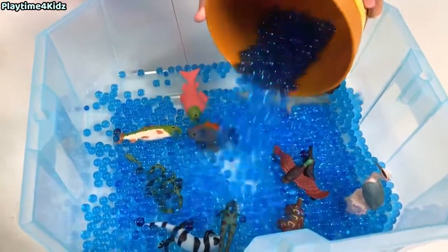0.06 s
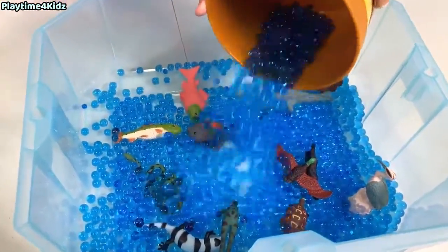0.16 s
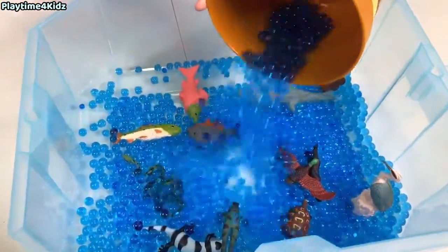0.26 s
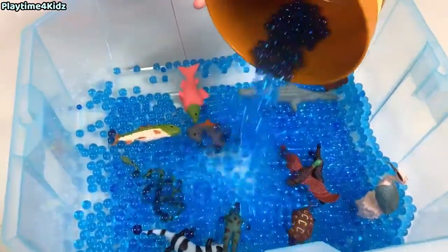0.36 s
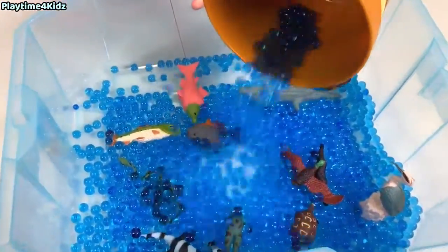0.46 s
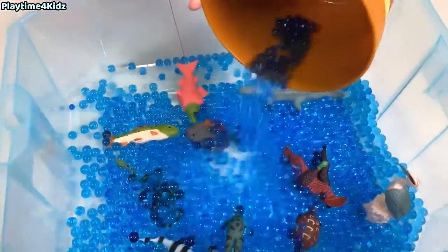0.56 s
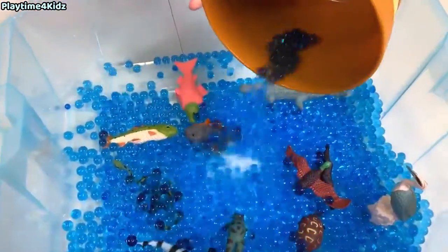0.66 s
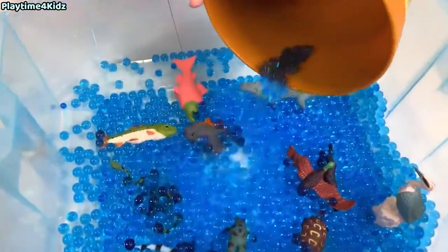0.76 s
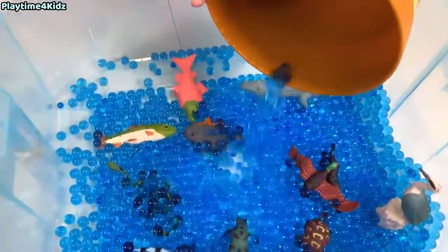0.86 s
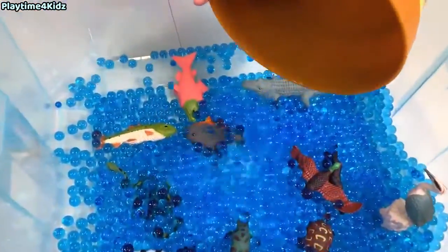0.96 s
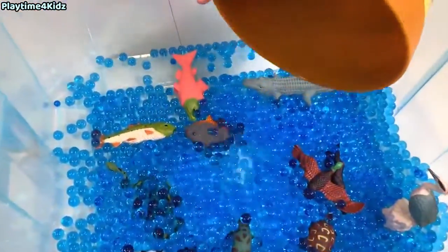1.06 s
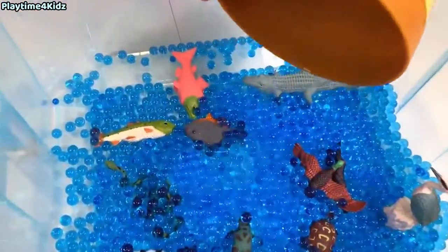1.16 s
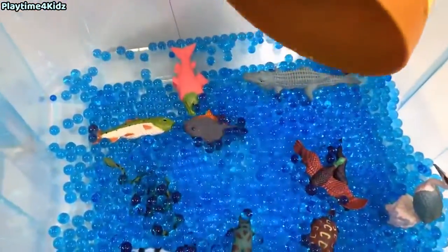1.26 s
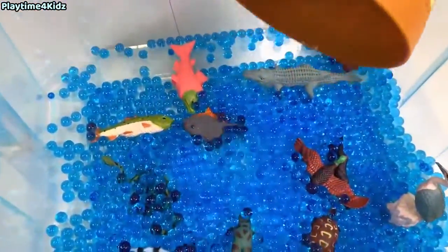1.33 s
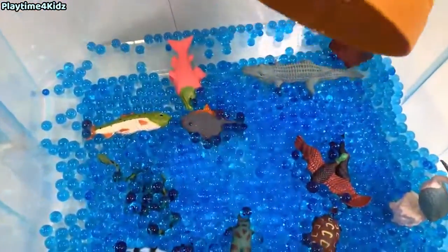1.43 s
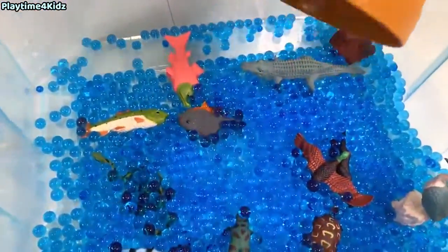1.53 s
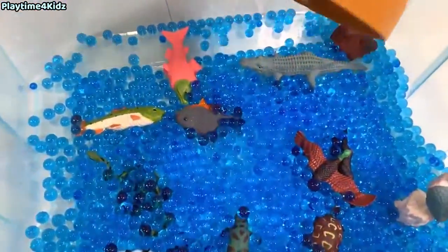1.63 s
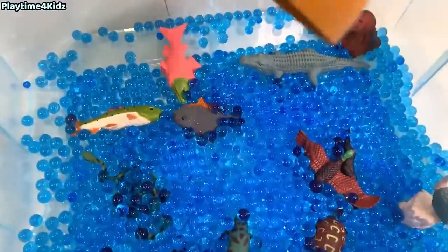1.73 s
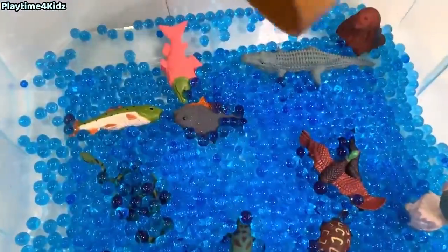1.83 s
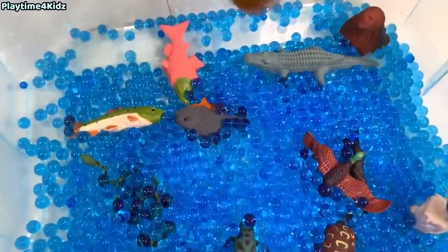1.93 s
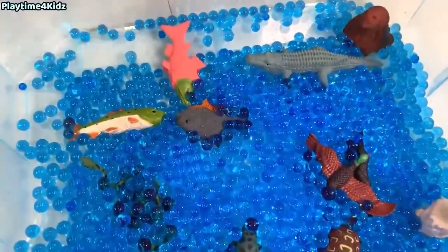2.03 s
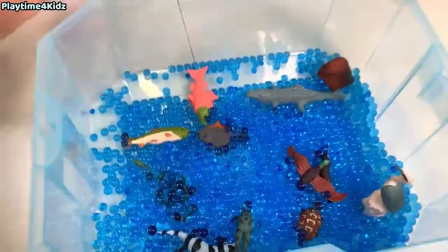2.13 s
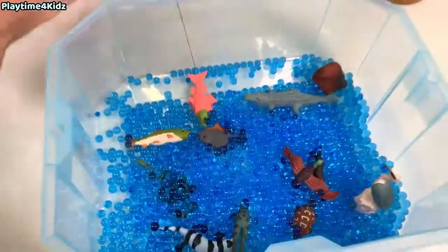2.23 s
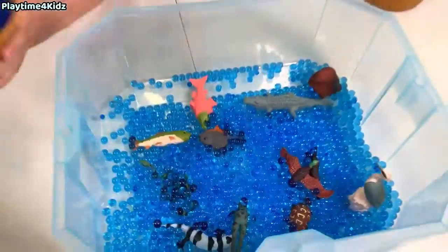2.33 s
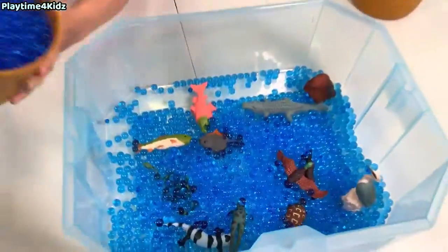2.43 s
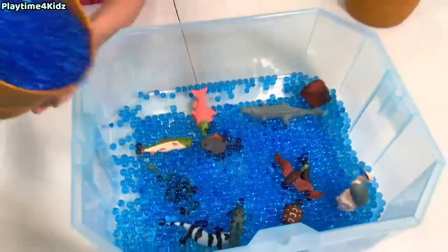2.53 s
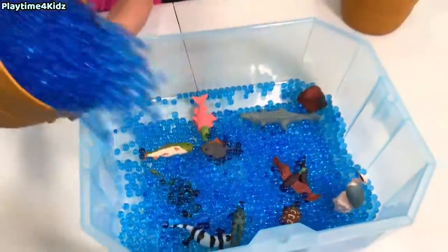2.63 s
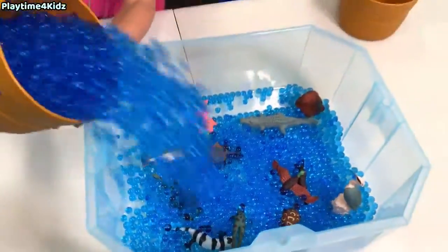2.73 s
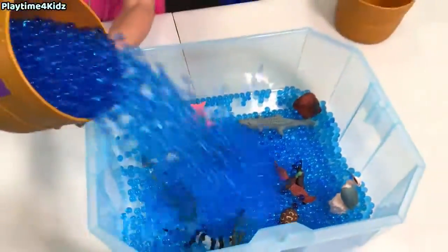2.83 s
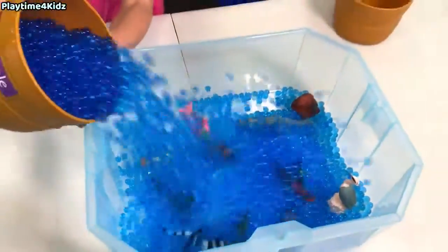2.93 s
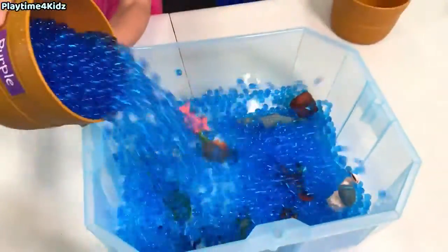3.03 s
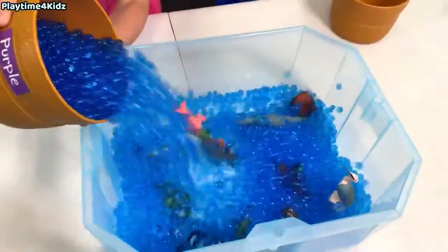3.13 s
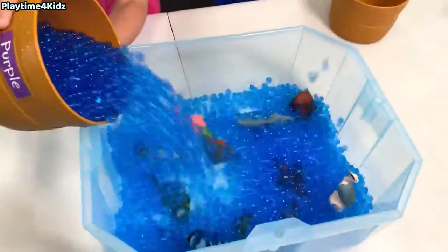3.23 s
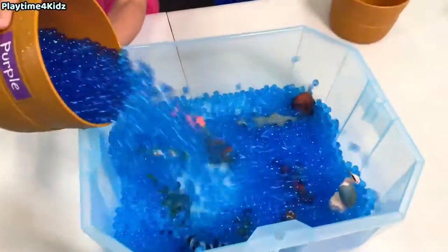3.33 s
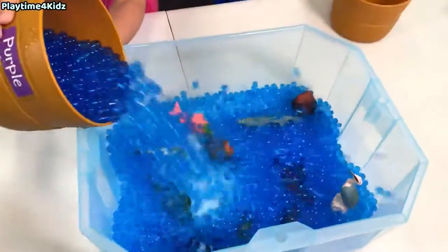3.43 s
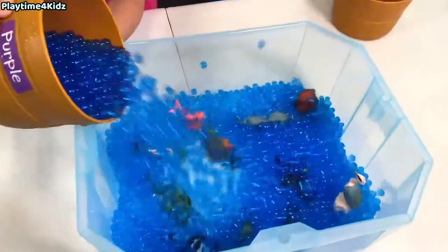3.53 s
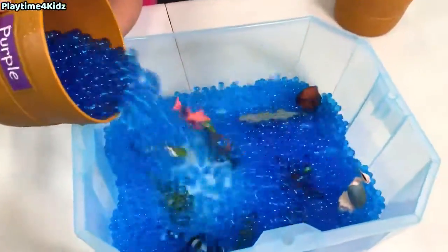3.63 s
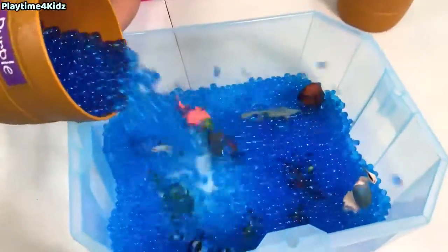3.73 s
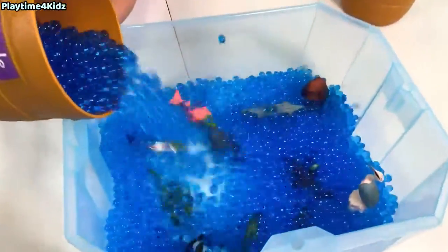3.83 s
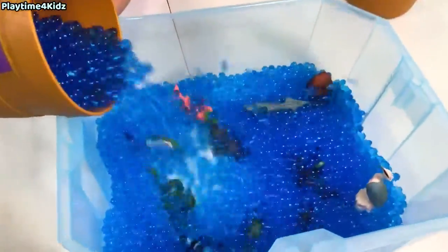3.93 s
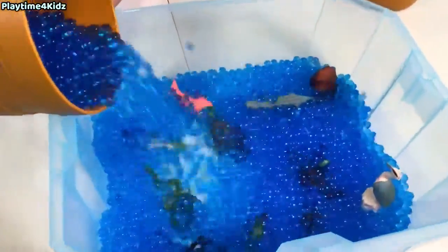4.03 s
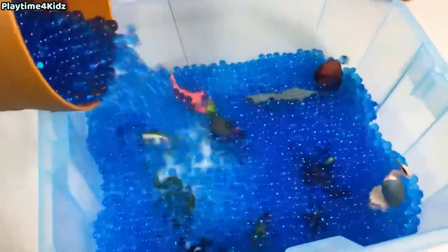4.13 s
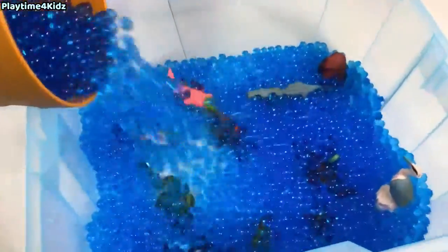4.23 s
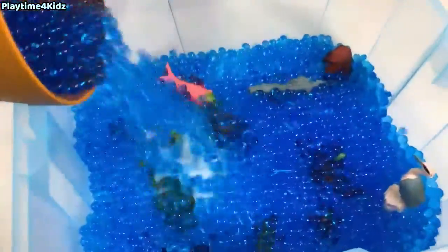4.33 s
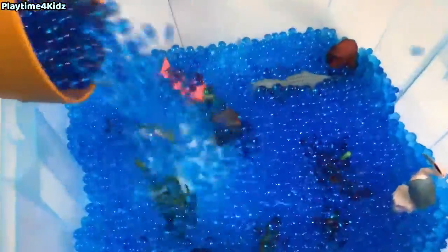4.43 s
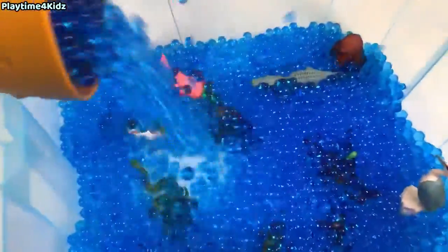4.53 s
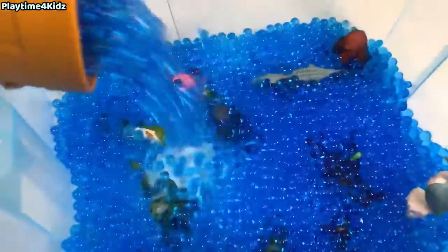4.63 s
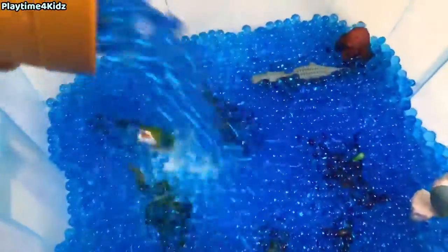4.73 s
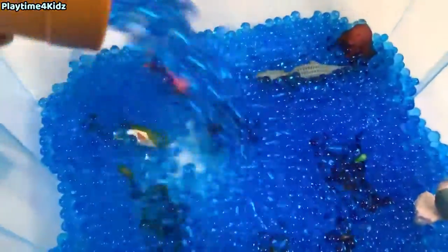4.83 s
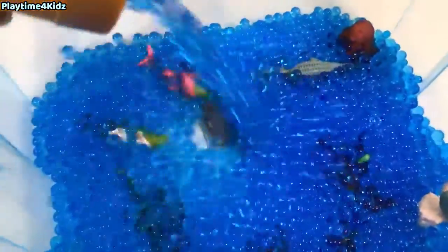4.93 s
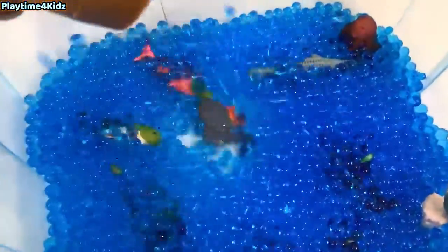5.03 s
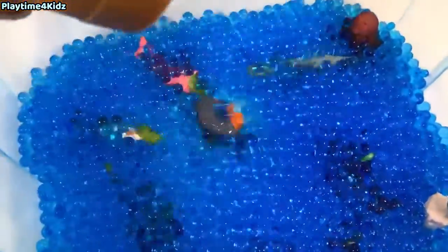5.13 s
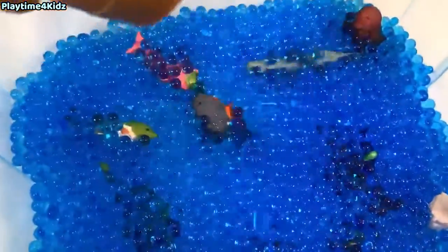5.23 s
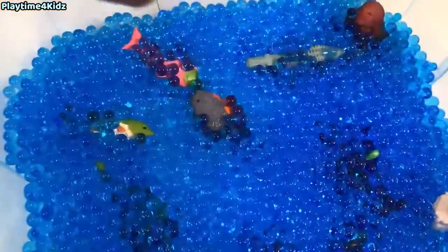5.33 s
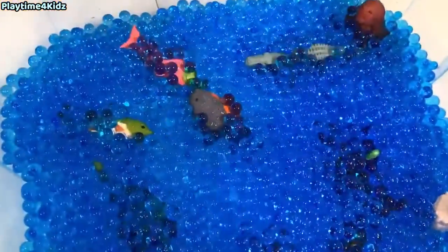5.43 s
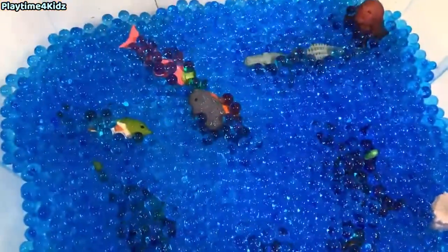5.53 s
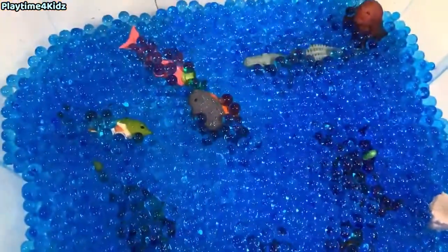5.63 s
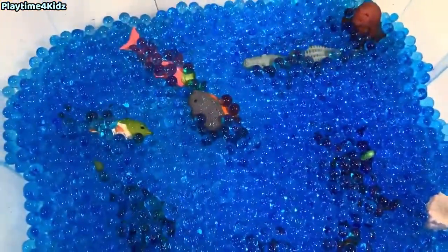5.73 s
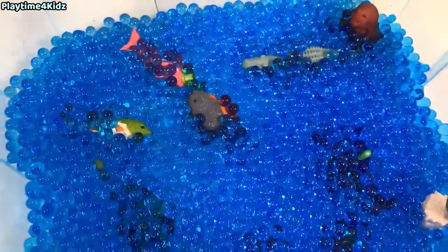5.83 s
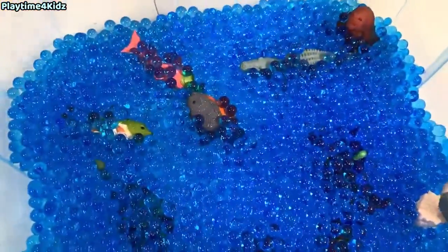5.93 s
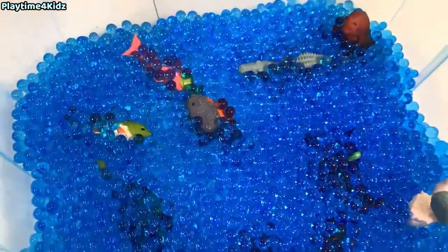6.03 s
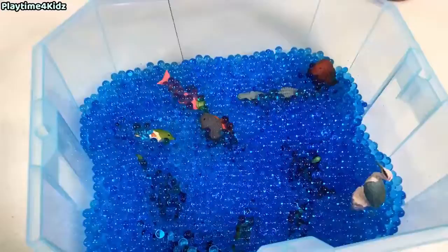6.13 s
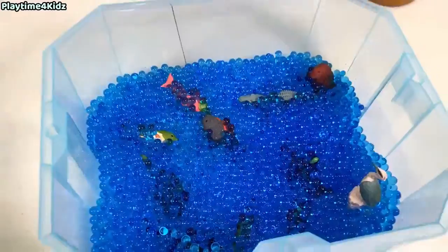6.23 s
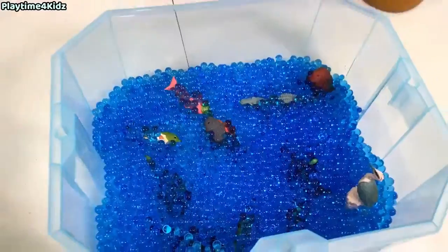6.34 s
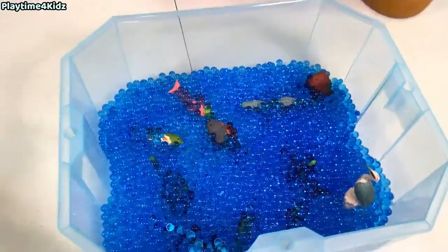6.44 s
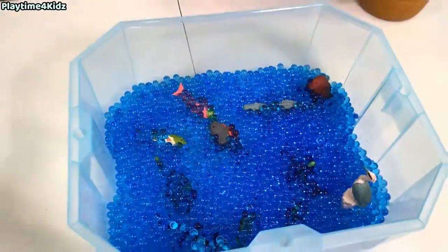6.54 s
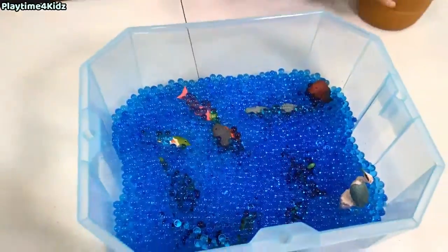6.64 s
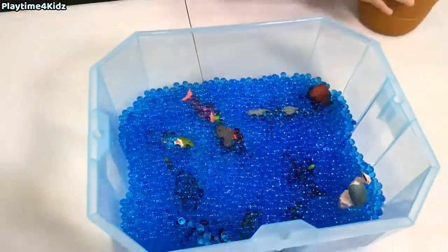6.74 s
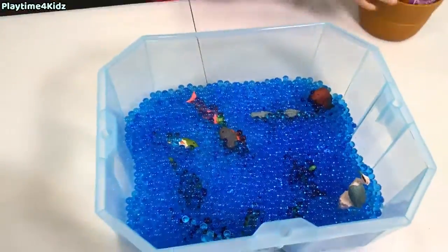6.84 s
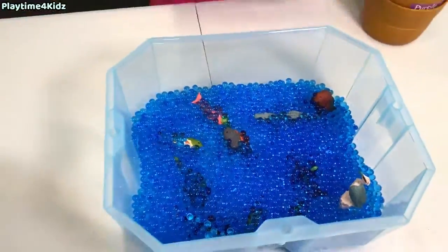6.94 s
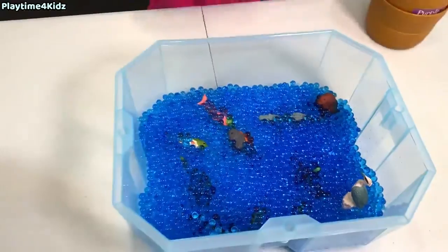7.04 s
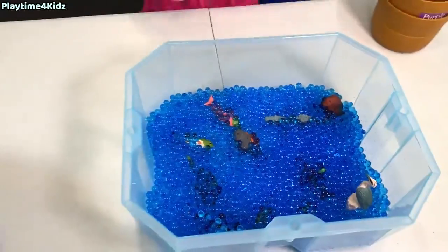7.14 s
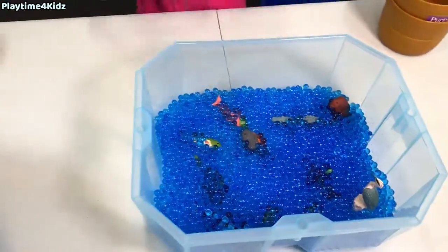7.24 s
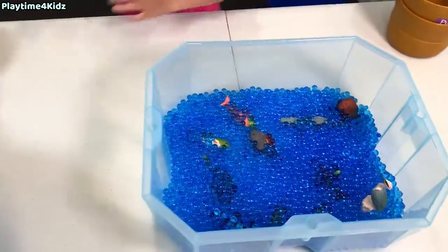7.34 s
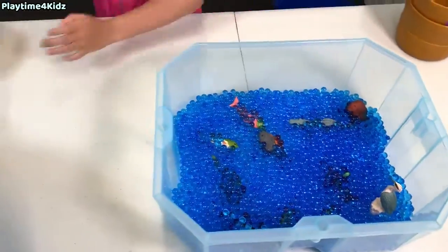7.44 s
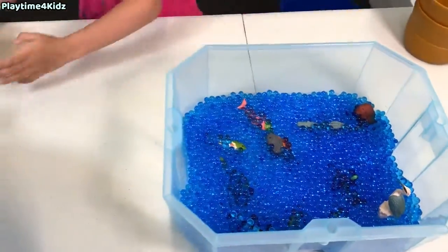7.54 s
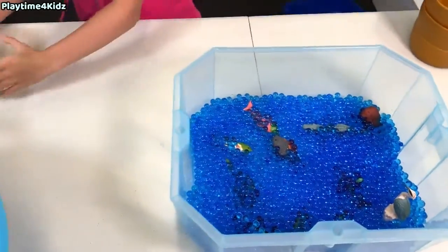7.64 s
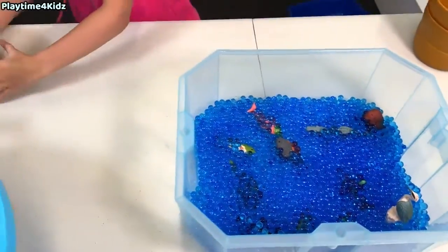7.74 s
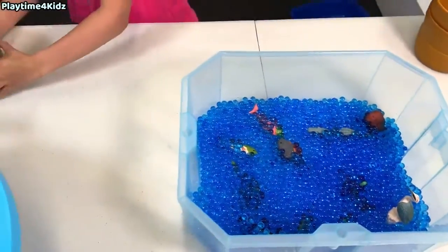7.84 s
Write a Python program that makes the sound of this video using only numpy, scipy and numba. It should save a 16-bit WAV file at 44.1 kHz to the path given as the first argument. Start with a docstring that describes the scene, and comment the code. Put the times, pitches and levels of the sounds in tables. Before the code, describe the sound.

Close up in a small quiet room, the weak end of a pour of wet gel beads thuds softly into a plastic bin, with tiny clicks and faint rubbing squeaks. After a pause, a long loud pour drums, patters and slaps, beads tapping the bin wall on the left. It thins into sharp wet clicks and settling crackle. Then an empty bucket knocks and scrapes into another with a falling hollow tone, leaving quiet crackle, low rumble and hiss.

```python
"""Wet gel beads are poured from plastic buckets into a half-filled plastic bin on a table, close to the
microphone: two brief pours with faint squeaks during and after them, then a soft shift and one long pour.
Noise impacts ring the bin floor as drumming, and patter, taps, thuds and slaps lie on top; wet clicks are
bursts in tiny air pockets. At the end the empty bucket knocks and rubs into another one, with damped modes
and trapped air. The heap crackles throughout in a small, quiet room with low rumble and hiss."""
import sys
import numpy as np
from scipy import signal
from scipy.fft import rfft, irfft
from scipy.io import wavfile
from numba import njit

SR = 44100
rng = np.random.default_rng(int(sys.argv[2]) if len(sys.argv) > 2 else 0)


def log_audio(samples):
    """Write samples as a 16-bit WAV file to the path given in sys.argv[1]."""
    # one column per channel
    frames = np.atleast_2d(samples).T
    # limit to full scale, then quantise
    limited = np.clip(frames, -1, 1)
    pcm = np.round(limited * 32767).astype(np.int16)
    wavfile.write(sys.argv[1], SR, pcm)


N = 347508
T = np.arange(N) / SR
TOP_HZ = 15900  # upper limit of the recorder
SLAP_PAN_DB, WALL_PAN_DB = -0.5, 7.5  # left minus right
CUSHION_POWER = 2.06  # the growing heap softens the patter late in a pour

# modes of the loaded bin floor: mode_hz, width_hz, level_db
BIN_MODES = [(64, 78, -39), (114.7, 18.5, 1.5), (127, 13, 1), (159.3, 11, -7.5), (179.9, 5.3, 2.5),
             (227.6, 17, 2.5), (279, 20.5, 0), (338, 31, -3.5), (380.6, 37, -1), (453.2, 33.4, 0.5),
             (530, 62, -3), (609, 168, -7), (759, 47, -4), (804, 103, -9)]
# modes of the bare bin walls: mode_hz, width_hz, level_db
WALL_MODES = [(996, 50, -3), (1340, 120, -0.5), (1660, 140, 1), (1820, 180, 2.5), (2070, 86, 2),
              (3020, 160, -10), (3400, 90, -13)]
# modes of the bucket walls: mode_hz, width_hz, level_db
BUCKET_MODES = [(89, 38, 3), (124, 26, 3.5), (174, 22, 1.5), (225, 33, -2.5), (275, 11, -2),
                (363, 310, -9.5), (590, 37, -9), (740, 72, -41), (1060, 140, -27)]
# colour of bead striking bead: frequency_hz, level_db
PATTER_COLOUR = [(500, -21.5), (790, 3), (926, -12.5), (1020, -3), (1210, -12), (1480, -6), (1650, -7.5),
                 (2050, -8), (2400, -11.5), (3420, -11), (4980, -20.5), (6370, -16), (7320, -32),
                 (9070, -21.5), (11000, -40), (14300, -38), (22000, -120)]
# colour of the wet film between beads: frequency_hz, level_db
FILM_COLOUR = [(3240, -9), (5500, -14.5), (6640, -12), (7660, -7.5), (8870, -2.5), (9920, -5),
               (11400, -18.5), (13800, -6.5), (16000, -29)]
# clumps slapping down: start_s, slap_db, treble_db (sets the colour), thump_db, pitch_hz of the spot struck
SLAPS = [(0.1125, -27.5, -14, -25.5, 740), (0.3397, -22.5, -7, -27, 3740), (0.4451, -25, -9, -30, 4000),
         (2.791, -23.5, -31, -36, 1680), (2.82, -30, -15, -46, 714), (2.831, -19, -6, -38, 2850),
         (2.896, -12.5, -19, -43, 1660), (2.9594, -13.5, 2, -26, 1680), (3.0543, -12, -18, -22, 1710),
         (3.1637, -11.5, -4, -36, 1600), (3.2526, -25, -8, -17, 590), (3.2926, -15.5, -5, -39, 770),
         (3.3483, -10.5, -2, -18, 1710), (3.383, -14, -34, -18, 1670), (3.421, -12.5, -18, -18, 1740),
         (3.5826, -7.5, -22, -26, 760), (3.632, -14.5, -11, -19, 1660), (3.799, -18, -6, -29, 3270),
         (3.819, -13.5, -6, -19.5, 2950), (3.8601, -11.5, -4, -28, 2880), (3.927, -13.5, -7, -40, 1830),
         (3.942, -10.5, 0, -32, 1830), (3.998, -18, -40, -35, 1050), (4.1054, -19.5, 0, -16.5, 620),
         (4.2165, -11, -24, -22, 780), (4.2274, -24, -15, -35, 1690), (4.274, -19.5, -21, -17.5, 795),
         (4.347, -12, -7, -17.5, 1014), (4.361, -18, -21, -40, 787), (4.444, -18, -12, -30, 810),
         (4.4588, -15, -13, -23, 818), (4.5277, -17, -13, -35, 860), (4.6572, -21.5, -22, -20.5, 746),
         (4.6996, -18, -11, -21, 1650), (4.7473, -17, -9, -16, 623), (4.9490, -17, -15, -23, 840),
         (5.0083, -22, 0, -22.5, 624), (5.032, -17, 2, -26, 776)]


def amp(db):
    """Decibels to gain."""
    return 10 ** (np.asarray(db) / 20)


def unit(x):
    """Scale to rms 1."""
    return x / np.sqrt(np.mean(x ** 2))


def peak_unit(x):
    """Scale to peak 1."""
    return x / np.abs(x).max()


def pan(left_minus_right_db):
    """Gains of the left and right channel."""
    return amp(np.array([[left_minus_right_db], [-left_minus_right_db]]) / 2)


def add(out, start_s, x, pan_db=0):
    """Mix a sound in at start_s."""
    i = int(start_s * SR)
    x = (x * pan(pan_db))[:, :N - i]
    out[:, i:i + x.shape[1]] += x


def filtered(x, order, hz, kind="low"):
    """Causal Butterworth filter."""
    return signal.sosfilt(signal.butter(order, hz, kind, fs=SR, output="sos"), x)


def spectrum(points, f):
    """Gain at the frequencies f, interpolated between points of (Hz, dB)."""
    hz, db = np.transpose(points)
    return amp(np.interp(np.log(f + 1), np.log(hz), db))


def response(points, size=1024):
    """Causal (minimum-phase) impulse response of unit energy with the given colour."""
    cepstrum = irfft(np.log(spectrum(points, np.fft.rfftfreq(size, 1 / SR))))
    cepstrum[1:size // 2] *= 2
    cepstrum[size // 2 + 1:] = 0
    h = irfft(np.exp(rfft(cepstrum)))
    return h / np.linalg.norm(h)


def ring(modes, soft_hz=1100, size=SR // 2):
    """Unit-energy ring of a body: damped modes, neighbours swinging in opposite senses."""
    t = T[:size]
    h = np.zeros(size)
    for k, (hz, width_hz, db) in enumerate(modes):
        decay = np.exp(-np.pi * width_hz * t)
        h += (-1) ** k * amp(db) * width_hz * decay * np.cos(2 * np.pi * hz * t)
    h = filtered(h, 2, soft_hz)  # soft contacts
    return h / np.linalg.norm(h)


def favouring(modes, pitch_hz, loss_db_per_oct):
    """Modes that grow weaker the further they lie from the pitch of the spot struck."""
    return [(hz, width_hz, db - loss_db_per_oct * abs(np.log2(hz / pitch_hz))) for hz, width_hz, db in modes]


def through(x, h):
    """Pass both channels through an impulse response."""
    return signal.oaconvolve(x, np.atleast_2d(h), axes=1)[:, :x.shape[1]]


def diffuse(size, side=((100, -21), (400, -14), (1300, -3), (2400, 0))):
    """White noise at two microphone ports; side sets how far they differ, as (Hz, side minus mid dB)."""
    mid, other = rng.standard_normal((2, size))
    g = spectrum(side, np.fft.rfftfreq(size, 1 / SR))
    ports = rfft(mid) + g * rfft(other) * np.array([[1], [-1]])
    return irfft(ports / np.sqrt(1 + g ** 2), size)


def walk(rate):
    """Slow random wander with a spread near 1, taking rate new values a second."""
    return 1.2 * np.interp(T * rate, np.arange(N // 10), rng.standard_normal(N // 10))


def envelope(start, rise_s, stop, release_db_per_s, sag_db=0, power=1):
    """Gain that rises, sags by sag_db until the stop and then dies away."""
    attack = np.clip((T - start) / rise_s, 0, 1) ** 1.05
    progress = np.clip((T - start) / (stop - start), 0, 1)
    return attack * amp(-sag_db * progress ** power - release_db_per_s * np.maximum(T - stop, 0))


def burst(decay_s, lag_ms=.12, side_db=-4.0, size=4096):
    """A crack of noise that swells as the soft gel flattens, then dies away; the right port lags."""
    t = T[:size]
    swell = 1 - np.exp(-t / .001)
    noise = diffuse(size, side=((100, -2), (700, -7), (2400, side_db)))
    left, right = noise * swell * np.exp(-t / decay_s)
    return np.array([left, np.roll(right, round(lag_ms * SR / 1000))])


def pocket(hz, cycles, lag_s=0., size=1024):
    """An air pocket: a damped tone that swells and fades in a few cycles; the right port lags by lag_s."""
    turns = hz * np.maximum(T[:size] - np.array([[0], [lag_s]]), 0)
    return turns / cycles * np.exp(1 - turns / cycles) * np.sin(2 * np.pi * turns)


def plops(count, low_hz, high_hz, cycles, spread_db, lag_s=0.00018):
    """Tiny air pockets closing between wet beads, each with its own pitch and place; rms 1."""
    out = np.zeros((2, N))
    for when, pitch, size, side, place in rng.random((count, 5)):
        hz = low_hz * (high_hz / low_hz) ** pitch
        plop = pocket(hz, cycles, place * lag_s, size=int(10 * cycles * SR / hz))
        add(out, when * T[-1], plop * amp(spread_db * size ** 3), 6 * (side - .5))
    return unit(out)


def landings(rate, spread_db, lag_ms=0.074, scatter_ms=0.15):
    """Random impacts of rms near 1, rate a second; each reaches the right port with its own lag."""
    chance, size, place = rng.random(N), rng.standard_normal(N), rng.standard_normal(N)
    share = np.clip(rate / SR, 1e-5, 1)
    strength = unit(amp(spread_db * np.clip(size, -2, 2))) * rng.choice([-1, 1], N)
    push = (chance < share) * strength / np.sqrt(share)
    late = np.arange(N) + np.round((lag_ms + scatter_ms * place) * SR / 1000).astype(int)
    return np.array([push, np.bincount(np.clip(late, 0, N - 1), push, N)])


@njit
def resonance(x, hz, width):
    """Band-pass with a moving centre, gain 1 there (state-variable filter)."""
    y, band, low = np.empty(len(x)), 0., 0.
    for i in range(len(x)):
        g, k = np.tan(np.pi * hz[i] / SR), width / hz[i]
        v = (band + g * (x[i] + 1e-18 - low)) / (1 + g * (g + k))
        band, low = 2 * v - band, low + 2 * g * v
        y[i] = k * v
    return y


def room_tone():
    """Steady low rumble and hiss with two soft, wavering resonances, as of ventilation."""
    # colour of the rumble and hiss: frequency_hz, level_db
    tone_colour = [(15, -48), (25, -5.5), (63, 2.5), (92, -11.5), (130, -11), (153, -16.5), (180, -8.5),
                   (285, -12.5), (344, -18), (677, -18), (1020, -30.5), (1130, -17), (1740, -18),
                   (4870, -22), (16000, -33)]
    # how far the two ports differ: frequency_hz, side_minus_mid_db
    tone_side = [(60, -8), (150, -13.5), (1400, -7), (6000, -58), (15000, 1)]
    hiss = through(diffuse(N, side=tone_side), response(tone_colour, size=8192))
    ducts = 0
    for hz, width_hz, db in [(736., 61., -63.5), (1176., 170., -66.5)]:
        ducts = ducts + amp(db) * unit(resonance(rng.standard_normal(N), np.full(N, hz), width_hz))
    return hiss * amp(-53.5 + .5 * walk(30)) + ducts * amp(3.1 * walk(26))


def bumps():
    """Dull nudges of the table: its short bending waves arrive first, so each one falls in pitch."""
    # soft bumps on the table: start_s, level_db
    nudges = [(1.578, -45), (2.409, -42.5), (2.434, -46), (6.207, -38), (7.229, -39)]
    out, t = np.zeros((2, N)), T[:SR // 10]
    hz = 65 + 520 * np.exp(-t / 0.0038)
    chirp = np.sin(2 * np.pi * np.cumsum(hz) / SR)
    for start_s, db in nudges:
        add(out, start_s, amp(db) * np.exp(-((t - .008) / 0.0074) ** 2) * chirp)
    return out


def squishing():
    """Soft swells of wet rustle: bands of noise, each register coming and going on its own."""
    # registers of the rustle: centre_hz, level_db before the swells
    registers = [(1300, -74.5), (2400, -76), (4500, -81.5)]
    noise, out = rng.standard_normal((2, N)), 0
    for hz, db in registers:
        band = filtered(noise, 2, [hz / 1.3, hz * 1.3], "band")
        swell_db = 6.5 * np.minimum(walk(22), 2)
        out = out + unit(band) * amp(db + swell_db)
    return out


def settling():
    """The wet heap keeps creeping, in little flurries: soft squishes, low gurgles and finer ticks."""
    low = plops(count=600, low_hz=900, high_hz=2400, cycles=1.8, spread_db=9)
    soft = plops(count=1500, low_hz=2200, high_hz=7000, cycles=1.6, spread_db=8)
    fine = plops(count=900, low_hz=6500, high_hz=15000, cycles=1.8, spread_db=10)
    crackle = amp(-5.5) * low + soft + amp(-5.0) * fine
    return crackle * amp(-59 + 1.8 * walk(9.9)) + squishing()


def squeaks():
    """Short gliding, wavering tones, as of wet plastic rubbed; the rough ones smear into a hiss."""
    # faint squeaks: start_s, length_s, first_hz, last_hz, level_db, roughness (0-1)
    rubs = [(0.076, 0.065, 2170, 2390, -52, 0.3), (0.123, 0.085, 2420, 2530, -55, 0.3),
            (0.196, .11, 2440, 2250, -47.5, 0.3), (0.983, 0.12, 2320, 1965, -49, 0.15),
            (1.063, 0.17, 2014, 2110, -53, 1), (1.383, 0.051, 1820, 1940, -54.5, 0.15),
            (1.476, 0.097, 1850, 1710, -47, 0), (1.621, 0.11, 1965, 1857, -45.5, 0.05),
            (1.722, 0.08, 1850, 1960, -56, 0.24), (1.885, 0.24, 2310, 2214, -49, 1),
            (2.42, 0.093, 4600, 5200, -59, .9)]
    out, waver = np.zeros((2, N)), 1 + 0.017 * walk(90)
    for start_s, length_s, first_hz, last_hz, db, rough in rubs:
        u = np.linspace(0, 1, int(length_s * SR))
        hz = (first_hz + (last_hz - first_hz) * u) * waver[int(start_s * SR):][:len(u)]
        phase = 2 * np.pi * np.cumsum(hz) / SR
        grit = filtered(rng.standard_normal((2, SR)), 3, 310)[:, -len(u):]
        hiss = unit(grit[0] * np.cos(phase) + grit[1] * np.sin(phase))
        rough = np.clip(rough, 0, 1)
        tone = (1 - rough) * np.sin(phase) + rough * hiss
        swell = np.abs(np.sin(np.pi * u ** 0.96)) ** 0.72  # a little quicker to rise than to trail off
        add(out, start_s, unit(tone) * swell * amp(db))
    return out


def stacking():
    """The bucket knocks, rubs and rattles into its twin; the gap narrows and the trapped air falls in pitch."""
    # resonance of the trapped air: time_s, pitch_hz
    air_gap = [(6.32, 518), (6.39, 525), (6.44, 490), (6.545, 478), (6.575, 420), (6.62, 356), (6.7, 266),
               (6.8, 228)]
    # the buckets knocking: start_s, wall_db, trapped_air_db, tick_db, rim_db
    bucket_hits = [(6.3252, -26.5, -19, -29, -32), (6.364, -40, -26, -60, -48), (6.411, -31, -43, -60, -54),
                   (6.439, -37, -29, -52, -58), (6.538, -37, -24.5, -32, -31), (6.575, -39, -36, -40, -44),
                   (6.612, -43, -29, -43, -46), (6.684, -32, -41, -63, -60), (6.764, -41, -46, -43, -32)]
    # jerks of the sliding bucket: start_s, stop_s, rubbing_db, lost_by_the_stop_db
    jerks = [(6.335, 6.53, -28, 9.5), (6.541, 6.692, -31.5, 8.5), (6.762, 6.785, -40.5, 3.5)]
    # modes of the bucket rims: mode_hz, width_hz, level_db
    rim_modes = [(464, 51, 4), (784, 50, -1), (1100, 55, -3), (1290, 71, -12), (1750, 90, -12),
                 (1950, 120, -19), (2250, 100, -16)]
    air_pan_db = -3.5
    out, walls, rims = np.zeros((2, N)), ring(BUCKET_MODES), ring(rim_modes, soft_hz=2500)
    scrape = response([(300, 3), (1000, 3.5), (2000, 8.0), (3000, 1), (4200, 1.5), (7000, -5.0), (15000, -10)])
    air_hz, air_width_hz = np.interp(T, *np.transpose(air_gap)), 24.
    for start_s, wall_db, air_db, tick_db, rim_db in bucket_hits:
        add(out, start_s, peak_unit(walls) * amp(wall_db))
        add(out, start_s, through(burst(decay_s=0.0053), scrape) * amp(tick_db))
        add(out, start_s, peak_unit(rims) * amp(rim_db))
        puff = pocket(air_hz[int(start_s * SR)], cycles=2.6, size=4096)  # air squeezed out
        add(out, start_s, puff * amp(air_db), air_pan_db)
    slide = 0
    for start, stop, db, sag_db in jerks:
        slide = slide + amp(db) * envelope(start, 0.0059, stop, 126, sag_db)
    rub = landings(1800, spread_db=1.5) * slide
    rattle = amp(-19) * through(landings(170, spread_db=-3.0) * slide, rims)  # the rims catch and slip
    push = amp(22.5) * rub[0]
    air = resonance(push, air_hz, air_width_hz)
    air = air + amp(-17.0) * resonance(push, 1.8 * air_hz, air_width_hz)
    air = filtered(air, 2, 900) * pan(air_pan_db)
    return out + air + amp(0.5) * through(rub, walls) + amp(-19.5) * through(rub, scrape) + rattle


def shifting():
    """A soft rumble of beads rolling against the wall of the full bucket as it is tipped."""
    swell = amp(-52) * np.exp(-((T - 2.63) / 0.07) ** 2)
    return through(landings(860, spread_db=3.5) * swell, ring(BUCKET_MODES))


def snap(hz, decay_s):
    """A wet film breaks: a brief crackle in a tiny pocket of air."""
    t = T[:512]
    cavity = np.exp(-t * hz / 3.4) * np.sin(2 * np.pi * min(hz, TOP_HZ) * t)
    return through(burst(decay_s, lag_ms=-.2, side_db=-3.0), cavity / np.linalg.norm(cavity))


def clicks():
    """Single beads snap off the rim and off each other, each with a weaker spray of film noise."""
    # single wet beads snapping free: start_s, level_db, pitch_hz
    snaps = [(0.097, -27, 8550), (0.302, -27, 9000), (0.115, -39, 4400), (0.243, -36, 4000),
             (0.337, -27, 10000), (0.361, -41, 3800), (0.448, -32, 4200), (0.501, -19.5, 8440),
             (0.643, -31, 7000), (0.673, -23, 9400), (0.78, -29, 6740), (0.821, -29.5, 7900),
             (0.983, -27.5, 9300), (1.353, -35, 3400), (1.4318, -37, 3470), (1.672, -31.5, 3150),
             (4.851, -23, 7340), (4.894, -23.5, 9430), (4.994, -15, 9350), (5.04, -17.5, 9100),
             (5.051, -17.5, 6840), (5.0684, -25, 6660), (5.121, -28, 6900), (5.761, -29, 5100),
             (5.8054, -37, 3100), (6.056, -32, 3820), (6.969, -39, 6100), (7.065, -37, 8100)]
    out, film = np.zeros((2, N)), response(FILM_COLOUR)
    for start_s, db, hz in snaps:
        spray = through(burst(decay_s=.004), film) * amp(-11) * hz / 9000
        add(out, start_s, (snap(hz, decay_s=0.0024) + spray) * amp(db), pan_db=-0.5)
    return out


def lumps():
    """A lump of beads lands: the heap gives a short pitched thud and bin modes near that pitch ring on."""
    # heavy lumps thudding into the heap: start_s, level_db, pitch_hz
    heap_thuds = [(0.113, -26, 179.6), (0.17, -31, 176), (0.335, -29, 178), (0.634, -34, 122),
                  (1.014, -31, 120), (2.927, -18, 255), (3.087, -19, 480), (3.128, -15, 248),
                  (3.252, -18, 225), (3.293, -17.5, 244), (3.387, -14.5, 223), (3.639, -15.5, 230),
                  (3.883, -20, 230), (3.944, -21.5, 127), (3.997, -18, 420), (4.044, -19.5, 218),
                  (4.278, -15, 423), (4.653, -23.5, 430), (4.808, -21.5, 231), (5.006, -21.5, 127),
                  (5.034, -20, 427), (5.085, -22.5, 112), (5.125, -30, 103), (5.152, -29, 407),
                  (5.183, -26, 172), (5.2, -37, 210)]
    out = np.zeros((2, N))
    for start_s, db, hz in heap_thuds:
        body = ring(favouring(BIN_MODES, hz, 18), size=6000)
        add(out, start_s, pocket(hz, cycles=1.21, size=4096) * amp(db))
        add(out, start_s, peak_unit(body) * amp(db - 10.5))
    return out


def wall(hz):
    """Ring of the bin wall, struck at a spot that favours the modes near hz."""
    return ring(favouring(WALL_MODES, hz, 20), soft_hz=3850, size=2048)


def wall_taps():
    """Beads tap the thin bare wall on the left, a wet tick and a short ping; weaker ones clatter between."""
    # single beads tapping the bare wall: start_s, level_db, pitch_hz
    bead_taps = [(2.8454, -21, 1700), (2.8945, -25, 1640), (2.9312, -23, 1620), (3.033, -19, 1640),
                 (3.0552, -25, 1700), (3.1077, -26, 1710), (3.141, -27, 1640), (3.1765, -16, 1670),
                 (3.2208, -19.5, 1620), (3.2624, -24, 1730), (3.3482, -18, 1730), (3.384, -20.5, 1630),
                 (3.5833, -21, 1600), (3.6284, -29, 1680), (3.6742, -23, 1630), (3.7765, -30, 1660),
                 (3.8324, -24, 2060), (3.8854, -35, 1990), (4.0487, -26, 2060), (4.1597, -31, 1620),
                 (4.2273, -22.5, 1630), (4.3024, -30, 1680), (4.3144, -25, 1890), (4.347, -22.5, 1640),
                 (4.36, -30, 1680), (4.3974, -30, 2120), (4.4658, -24, 1550), (4.4877, -28, 1880),
                 (4.575, -33, 1910), (4.5972, -27.5, 1660), (4.6568, -30, 1690), (4.6997, -33, 1960)]
    out, film = np.zeros((2, N)), response(PATTER_COLOUR)
    for start_s, db, hz in bead_taps:
        add(out, start_s, peak_unit(wall(hz)) * amp(db - 2.5), WALL_PAN_DB)
        add(out, start_s, through(burst(decay_s=0.0017), film) * amp(db - 4.5), SLAP_PAN_DB)
    # the long pour sprays three spots on the wall until the heap covers it
    spray = amp(-45) * envelope(2.79, 0.07, 4.68, 70, sag_db=8, power=CUSHION_POWER)
    clatter = 0
    for hz in (1300, 1680, 2160):
        hits = landings(38, spread_db=2.5, lag_ms=0.15, scatter_ms=0.1)
        clatter = clatter + through(hits, wall(hz))
    return out + clatter * spray * pan(WALL_PAN_DB)


def slaps():
    """A clump hits a toy or the wall: wet crack, ping of the spot, hard thump on the bin's upper modes."""
    out = np.zeros((2, N))
    body = peak_unit(filtered(ring(BIN_MODES, soft_hz=785), 1, 280, "high"))
    for start_s, db, treble_db, thump_db, hz in SLAPS:
        colour = [(300, 0.19), (900, 1.7), (1800, 0.63), (4000, 7.5 + treble_db / 2),
                  (9000, treble_db + 0.5), (11500, treble_db - 7.0), (15000, treble_db - 14)]
        crack = through(burst(decay_s=0.0012), response(colour))
        ping = pocket(hz, cycles=2.8, lag_s=0.000043, size=2048)
        add(out, start_s, crack * amp(db), SLAP_PAN_DB)
        add(out, start_s, ping * amp(db - 14.5), SLAP_PAN_DB)
        add(out, start_s, body * amp(thump_db))
    return out


def stream():
    """Gains of drumming, patter and fizz for each tip of a bucket, with lulls and showers of loose beads."""
    # tips of a bucket: start_s, rise_s, empty_s, drumming_db, drumming_lost_db, patter_db, patter_lost_db
    tips = [(-.03, 0.014, 0.8, -33, 7, -56, 6), (.88, 0.17, 0.99, -40.5, -1.5, -66, -4),
            (2.759, 0.12, 5.115, -23.5, 5.5, -38, 13)]
    # the stream falters briefly: time_s, half_length_s, drumming_lost_db (negative: gained), patter_lost_db
    lulls = [(3.514, 0.036, -3, 4), (3.731, 0.03, 1, 3.5), (4.07, 0.061, 1, 3.5), (4.205, 0.041, 2, 4)]
    # the last beads peel off the wet bucket wall: start_s, end_s, fizz_db
    peeling = [(0.15, 0.79, -59.5), (4.827, 5.1, -48.5)]
    thinning_power, run_out_db_per_s = 1.3, 116  # course of the drumming's loss; last beads coming to rest
    drum = patter = 0
    for start, rise_s, empty, drum_db, drum_sag_db, patter_db, patter_sag_db in tips:
        drum_tip = envelope(start, rise_s, empty, run_out_db_per_s, drum_sag_db, thinning_power)
        patter_tip = envelope(start, rise_s, empty, run_out_db_per_s, patter_sag_db, CUSHION_POWER)
        drum = drum + amp(drum_db) * drum_tip
        patter = patter + amp(patter_db) * patter_tip
    for time_s, half_s, drum_lost_db, patter_lost_db in lulls:
        lull = np.exp(-((T - time_s) / half_s) ** 2)
        drum = drum * amp(-drum_lost_db * lull)
        patter = patter * amp(-patter_lost_db * lull)
    showers = np.zeros((2, N))  # loose beads patter down after each clump
    for start_s, db, *_ in SLAPS:
        add(showers, start_s, amp(db - 24) * np.exp(-T[:SR // 4] / 0.018))
    patter = np.hypot(patter, showers[0])
    peel = 0
    for start, end, db in peeling:
        peel = peel + amp(db) * envelope(start, 0.043, end, 280)
    return drum, patter, np.hypot(amp(-17) * patter, peel)


def drumming(drum, hardness, flow, bunch):
    """Beads thud on the loaded bin; hard landings bring out its upper modes, and the whole heap heaves."""
    thuds = through(landings(1500 * flow, spread_db=2) * drum * amp(0.41 * bunch), ring(BIN_MODES))
    # the landing spot wanders and favours now one mode, now another
    spot_hz = np.clip(210 * 2 ** (0.627 * walk(22)), 60, 900)
    spot = resonance(thuds.mean(axis=0), spot_hz, 93.)
    thuds = amp(-4) * (thuds + amp(-1) * spot)
    boom = signal.sosfiltfilt(signal.butter(2, 260, fs=SR, output="sos"), thuds)
    upper = (thuds - boom) * hardness
    heap = ring([(57.4, 42, -5.5), (107.0, 28, 1.0), (180.1, 12.4, 4.0)])
    heave = through(landings(300 * flow, spread_db=2.5), heap) * drum  # the whole heap gives way
    return boom * amp(-1.0) + upper * amp(5.0) + heave * amp(-13.5) / np.maximum(flow, .12)


def pour():
    """The stream: the thicker it is, the more beads land each second; their level flutters in bunches."""
    drum, patter, fizz = stream()
    flow = np.sqrt(drum / amp(-17))  # flow 1 would mean drumming at -17 dB, a thicker stream than any that plays here
    hardness = (patter / (drum + 1e-9)) ** 0.23 * flow ** 0.5
    bunch = walk(110)
    hits = landings(1500 * flow, spread_db=0.5, lag_ms=0.14, scatter_ms=0.11)
    bead_hits = amp(4.0) * through(hits, response(PATTER_COLOUR))
    wall_hits = amp(-11.5) * through(hits, ring(WALL_MODES, soft_hz=3850))
    pockets = plops(count=5000, low_hz=1200, high_hz=4200, cycles=1.0, spread_db=14)
    beads = (bead_hits + wall_hits + amp(-3.0) * pockets) * patter * amp(1.65 * bunch) * pan(2.2)
    bubbles = plops(count=3000, low_hz=4500, high_hz=15000, cycles=2.4, spread_db=15, lag_s=-.00005)
    film_hits = landings(1500 * flow, spread_db=1.5, lag_ms=-0.22, scatter_ms=0.062)
    crackle = through(film_hits, response(FILM_COLOUR))
    film = (amp(4) * crackle + amp(-2) * bubbles) * fizz * amp(6.2 * np.minimum(bunch, 1.8))
    return drumming(drum, hardness, flow, bunch) + beads + film * pan(-3.2)


def echoes(tail):
    """Unit-energy tail of decaying noise that leaves the bass alone."""
    return filtered(diffuse(len(tail)) * tail / np.linalg.norm(tail), 2, 900, "high")


def room(x, near_db=-8, near_s=0.01, far_db=-14, t60=0.27, count=6):
    """Quick echoes between the bin walls, drifting among a few patterns, then the room's short tail."""
    place = np.interp(T * 100, np.arange(1000), rng.integers(0, count, 1000))
    near = 0
    for k in range(count):
        share = np.sqrt(np.maximum(1 - np.abs(place - k), 0))
        near = near + through(x * share, echoes(np.exp(-T[:2048] / near_s)))
    far = through(x, echoes(amp(-60 * T[:SR // 2] / t60)))
    return x + amp(near_db) * near + amp(far_db) * far


def scene():
    """Everything on the table, heard in the room."""
    beads = settling() + shifting() + clicks() + lumps() + wall_taps() + slaps() + pour()
    return room_tone() + room(bumps() + squeaks() + stacking() + beads)


def record(dry):
    """The recorder cuts the top with a steep low-pass."""
    return signal.sosfilt(signal.ellip(8, .2, 70, TOP_HZ, fs=SR, output="sos"), dry)


dry = scene()
out = record(dry)
log_audio(out)
```